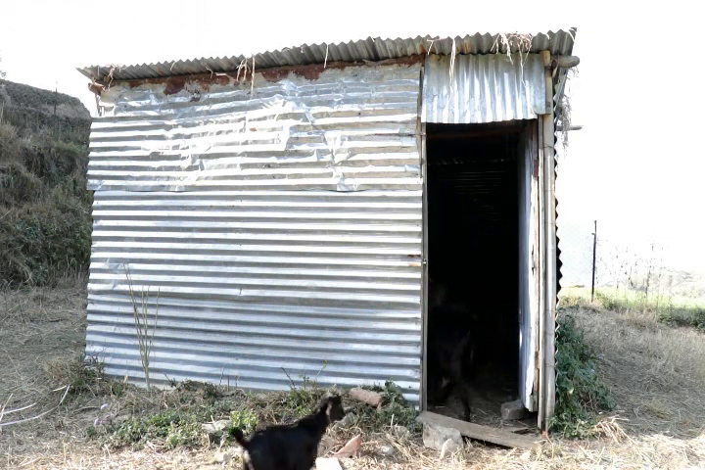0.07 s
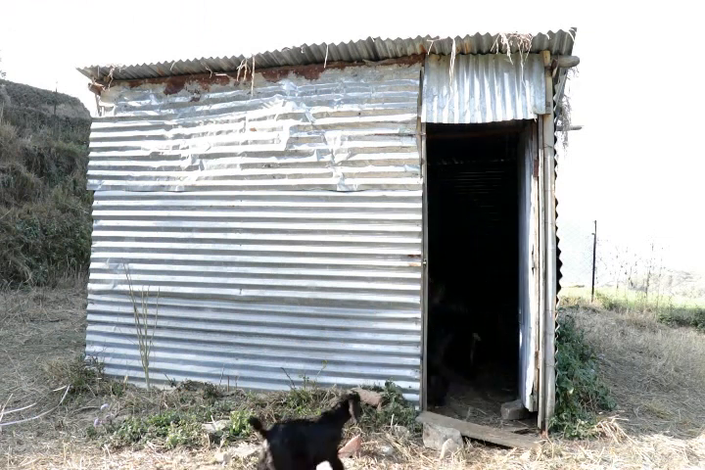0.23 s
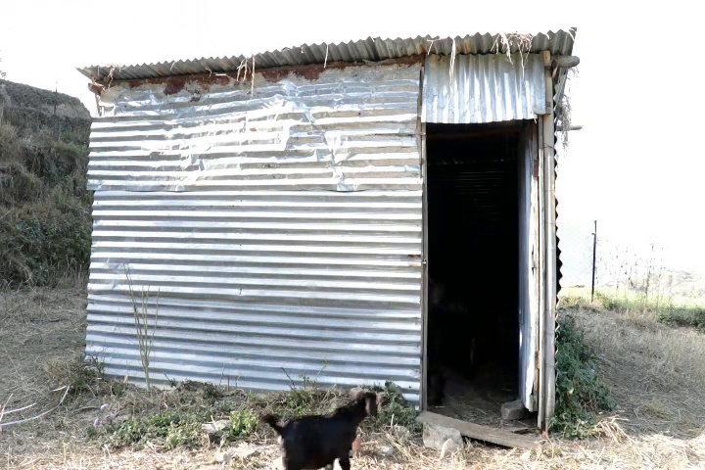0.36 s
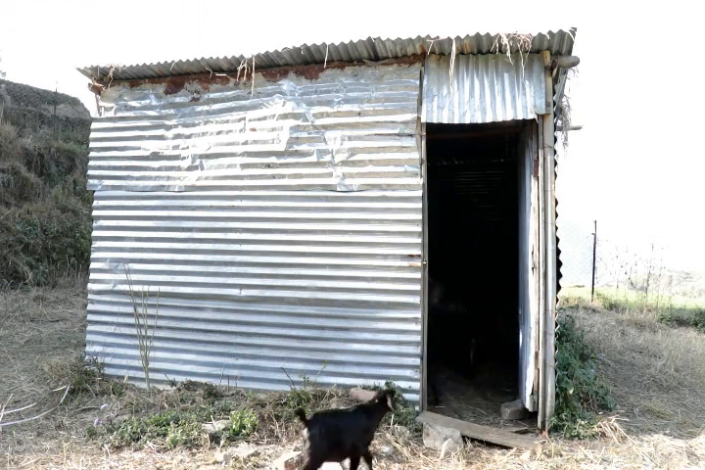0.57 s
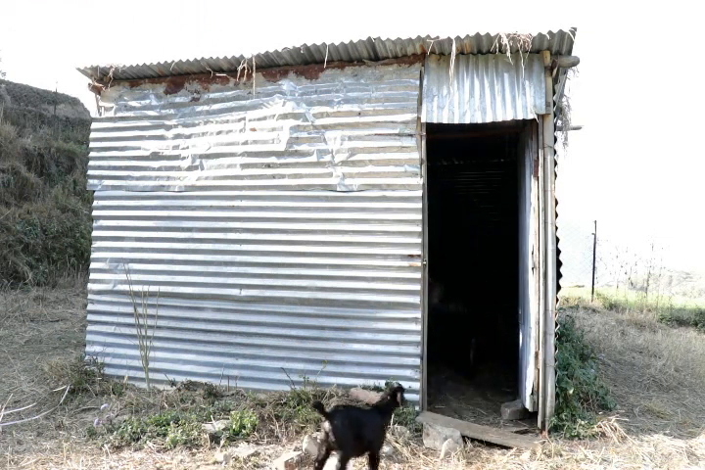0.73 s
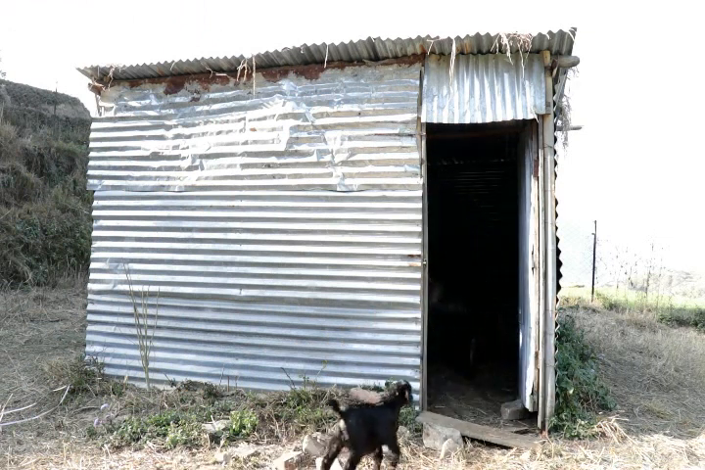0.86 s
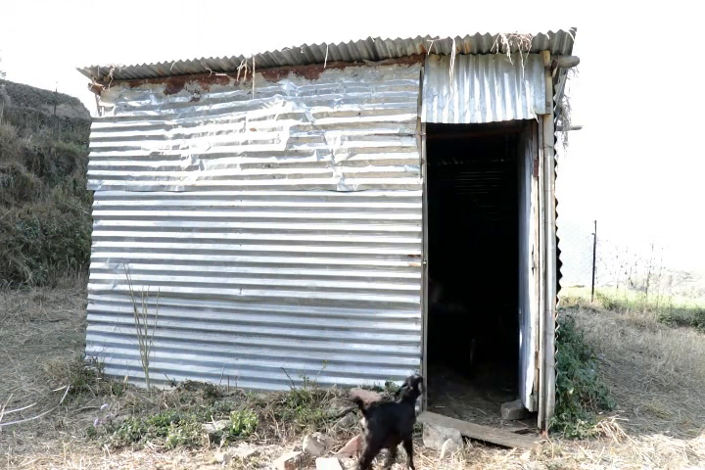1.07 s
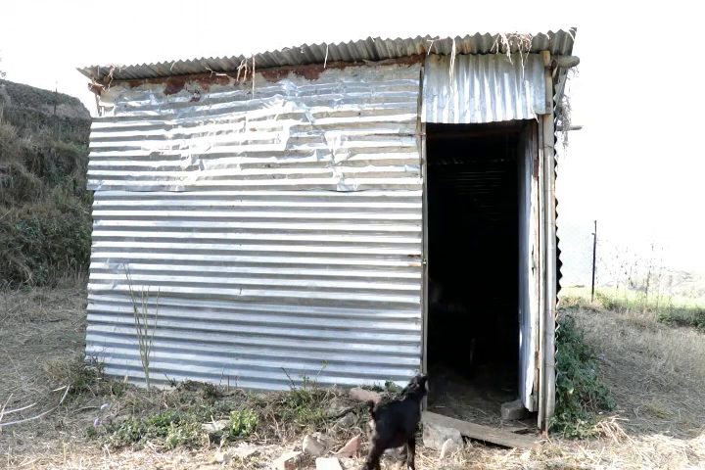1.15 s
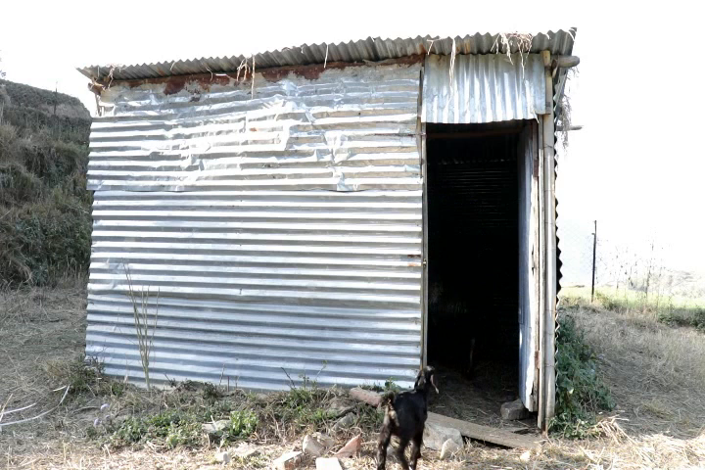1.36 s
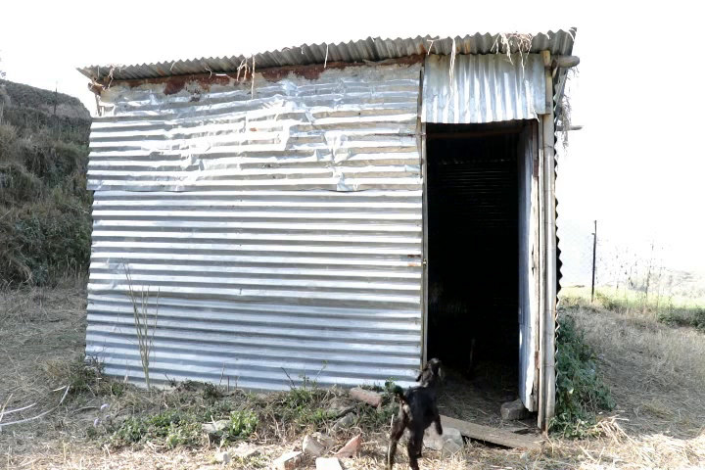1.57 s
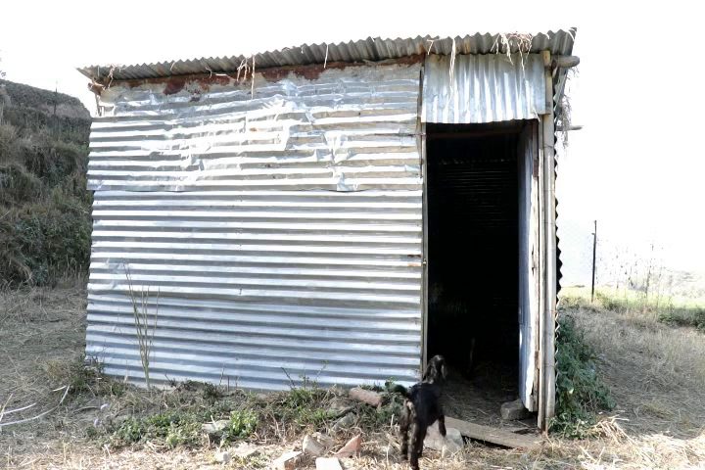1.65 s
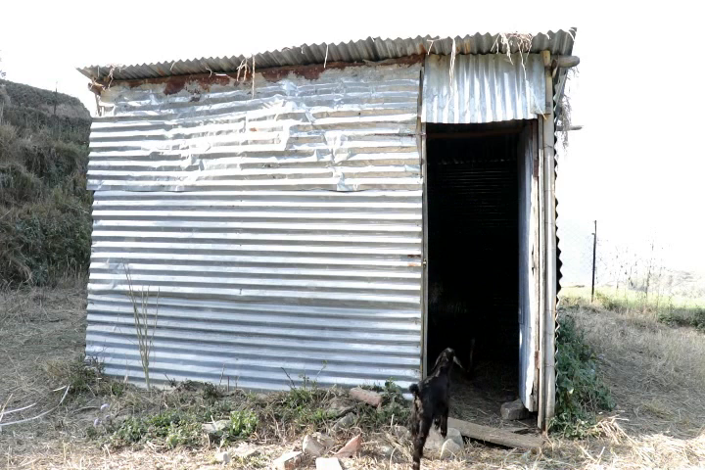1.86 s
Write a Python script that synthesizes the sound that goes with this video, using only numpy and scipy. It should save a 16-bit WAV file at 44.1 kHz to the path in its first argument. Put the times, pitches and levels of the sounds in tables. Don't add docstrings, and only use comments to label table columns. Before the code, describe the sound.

Single hard bang on a corrugated metal shed, hollow ring dying away over quiet goat steps outdoors

```python
import sys
import numpy as np
from scipy import signal
from scipy.fft import rfft, irfft, next_fast_len
from scipy.io import wavfile
from scipy.ndimage import map_coordinates

SR = 44100
rng = np.random.default_rng(int(sys.argv[2]) if len(sys.argv) > 2 else 0)


def gain_from_decibels(decibels):
    exponent = np.asarray(decibels, float) / 20
    return 10 ** exponent


def pcm_store(signal):
    levels = np.round(np.clip(np.atleast_2d(signal), -1, 1) * 32767)
    wavfile.write(sys.argv[1], SR, levels.astype(np.int16).T)


N = 83790

MODE_TOP_HZ = 5350


def door():
    # t/s, peak level/dB
    knock = [
        (0.225, -9.5),
    ]
    (knock_s, knock_db), = knock
    t = np.arange(N) / SR
    out = np.zeros(N)
    add(out, knock_s + 0.000752, gain_from_decibels(knock_db) * (panels(t) + hollow(t) + sheet(t)))
    walls = signal.butter(8, MODE_TOP_HZ, fs=SR, output="sos")
    add(out, knock_s + 0.0006, gain_from_decibels(knock_db) * signal.sosfilt(walls, blow(t)))
    return out + nudges() + signal.sosfilt(walls, rattles())


def blow(t):
    bend_turns = .2 * (1 - np.exp(-t / .0006))
    thud = np.zeros(len(t))
    for db, hz, t60_s in [(-1.5, 735, .045), (-5, 1100, .006), (-1, 2100, .0022)]:
        thud -= gain_from_decibels(db - 60 * t / t60_s) * np.sin(2 * np.pi * (hz * t + bend_turns))
    flex = gain_from_decibels(-13.5 - 60 * t / 0.068) * np.sin(2 * np.pi * 140 * t)
    return thud + flex


def panels(t):
    # f/Hz, level/dB, t60/s, twin offset/Hz
    door_modes = [(190.9, -31.5, 2.14, 2.4), (220.7, -23.5, 1.4, 6.3), (290.6, -17, 1.1, 5.7),
                  (375, -21, 1.12, 6.85), (419, -36, 0.88, 10), (494, -34.5, 2.1, 3.5),
                  (570, -29.5, 1.66, 4.2), (660, -22, 0.96, 5.3), (694, -15, 0.8, 2.9),
                  (720.5, -16.5, 0.82, 4.1), (767, -25.5, 1.12, 5.3), (912, -18.5, 0.53, 3.4),
                  (1136, -17, 0.32, 11.3),
                  (812, -30, .5, 3), (1023, -36, 0.37, 12), (1394, -38, 0.3, 5), (1640, -20.5, 0.45, 7.8),
                   (1923, -24.5, 0.51, 9.1), (2001, -11, 0.28, 2.4), (2191, -16, 0.37, 4.7),
                   (2764, -26, 0.27, 10), (2790, -21, 0.22, 14), (2982, -28, 0.42, 13.6),
                   (3390, -37, 0.18, 9), (3795, -24, .25, 3.1), (4320, -27, 0.18, 11),
                   (4820, -20, 0.15, 12)]
    twin_share, rise_s = 0.42, .005
    ring = np.zeros(len(t))
    for hz, db, t60_s, twin_hz in door_modes:
        start_turns = rng.random()
        mode = np.sin(2 * np.pi * (hz * t + start_turns))
        twin = np.sin(2 * np.pi * ((hz + twin_hz) * t + start_turns))
        ring += gain_from_decibels(db - 60 * t / t60_s) * (mode - twin_share * twin)
    return ring * (1 - np.exp(-t / rise_s))


def hollow(t):
    hz, twin_hz, twin_share, db, t60_s = 244.2, 3.96, 0.59, -20.5, 1.14
    beat = np.sin(2 * np.pi * hz * t) - twin_share * np.sin(2 * np.pi * (hz + twin_hz) * t)
    return gain_from_decibels(db - 60 * t / t60_s) * beat


def sheet(t):
    # f/Hz, level/dB per Hz
    sheet_tone = [(150, -10), (300, -6), (725, -6), (1400, -8), (2780, -9.5), (5200, -13.5), (5450, -15.5),
                  (10000, -20), (15500, -36)]
    # f/Hz, t60/s
    sheet_decay = [(70, 1.7), (150, 1.66), (300, 1.38), (700, 0.73), (1800, 0.47), (4800, 0.26),
                   (12800, 0.14)]
    count, low_hz, hold_s, rise_s = 360, 150, 0.039, .007
    scatter_db, t60_scatter = 2.5, 0.05
    hiss_db, step_db = -2.5, -3
    level_db, lumps_db, low_cut_hz = -9.5, .3, 78

    def aged(s):
        return np.hypot(s, hold_s) - hold_s

    place = (np.arange(count) + rng.random(count)) / count
    hz = low_hz + (MODE_TOP_HZ - low_hz) * place ** 1.3
    gain = gain_from_decibels(along(sheet_tone, hz) + scatter_db * rng.standard_normal(count)) * np.sqrt(np.gradient(hz))
    t60_s = along(sheet_decay, hz) * np.exp(t60_scatter * rng.standard_normal(count))
    short = t[:SR]
    fade = np.exp(np.outer(-np.log(1000) / t60_s, aged(short)))
    waves = np.sin(2 * np.pi * (np.outer(hz, short) + rng.random((count, 1))))
    modes = gain @ (fade * waves) * np.minimum(1, 5 * (1 - short))

    bins_hz, frames_s, z = signal.stft(rng.standard_normal(N), SR, nperseg=768)
    fade_db = -60 * aged(frames_s) / along(sheet_decay, bins_hz)[:, None]
    hiss = signal.istft(z * gain_from_decibels(fade_db), SR, nperseg=768)[1][:N]

    def dense(f):
        share = np.where(f < MODE_TOP_HZ, gain_from_decibels(hiss_db), gain_from_decibels(step_db))
        return gain_from_decibels(along(sheet_tone, f)) * share * (f > low_cut_hz)

    cloud = filtered(hiss, dense) * np.sqrt(SR / 2)
    cloud[:SR] += np.sqrt(2) * modes
    power = np.mean(gain_from_decibels(2 * along(sheet_tone, bins_hz))) * SR / 2
    level = gain_from_decibels(level_db + lumps_db * wobble(29.6))
    return level * cloud / np.sqrt(power) * (1 - np.exp(-t / rise_s))


def rattles():
    # t/s, level/dB, f/Hz, t60/s
    slaps = [(.2325, -10, 740, 0.017), (.236, -19, 4260, 0.09), (.2365, -16.5, 2840, 0.069),
             (.2425, -15, 2000, 0.027), (.248, -24, 4650, 0.048), (.249, -41, 2450, 0.024),
             (.259, -14.5, 770, 0.04), (.2595, -15, 2720, 0.041), (.272, -34, 3420, 0.049),
             (.288, -24, 1910, .06), (.29, -26, 700, 0.28), (.308, -28, 2580, 0.064),
             (.405, -32, 564, 0.11), (.478, -28, 392, 0.064), (.545, -35.5, 700, 0.11),
             (.635, -40, 434, 0.15), (.655, -49.5, 774, 0.24), (.441, -34, 660, 0.18),
             (.46, -26, 704, 0.06), (.498, -30.5, 570, 0.18), (.603, -33.5, 590, 0.07),
             (.771, -46, 660, 0.14)]
    return bursts(slaps, 0.24, rise_s=0.0022)


def nudges():
    # t/s, length/s, level/dB, f/Hz
    sways = [
        (.725, .235, -39.5, 246.5),
        (1.005, .17, -47, 245),
    ]
    out = np.zeros(N)
    for s, length_s, db, hz in sways:
        u = np.arange(round(length_s * SR)) / SR
        swell = np.abs(np.sin(np.pi * (u / length_s) ** 0.57)) ** 0.66
        add(out, s, gain_from_decibels(db) * swell * np.sin(2 * np.pi * hz * u))
    return out


def weeds():
    # t/s, level/dB
    shuffling = [(0, -52), (.05, -53), (.09, -50), (.14, -55), (.17, -59.5), (.58, -60), (.66, -53.5),
                 (.71, -57), (.82, -55.5), (.87, -59), (1.06, -58), (1.172, -51), (1.27, -56), (1.328, -50),
                 (1.45, -61), (1.7, -64.5), (1.8, -60), (1.9, -58)]
    # f/Hz, level/dB per Hz
    weed_tone = [(350, -51), (600, -26), (1360, -4.5), (2070, -11), (2280, -10.5), (10600, -9),
                 (15500, -12)]
    # t/s, level/dB, f/Hz, t60/s
    snaps = [(.1446, -41, 5830, .02), (.4409, -37.5, 5530, 0.023), (.449, -47, 5960, 0.024),
             (.493, -53, 11000, 0.16), (.5237, -37.5, 6360, 0.023), (.6085, -50, 8000, .01),
             (.6374, -41, 8000, 0.019), (.7272, -42, 7900, 0.032), (.781, -42, 4700, 0.04),
             (.9009, -41, 7900, 0.055), (.917, -47.5, 9000, 0.095), (1.0096, -42, 9700, 0.089),
             (1.065, -57, 13000, 0.018), (1.0939, -44.5, 9500, 0.032), (1.8287, -44, 9100, 0.017),
             (.5626, -44, 10000, .008),
        (.5786, -39, 8000, .008),
    ]
    rustle_db, grain_db, grains_per_s = 3, 2.5, 2300
    struck = rng.random(N) < grains_per_s / SR
    grains = struck * gain_from_decibels(grain_db * rng.exponential(size=N)) * rng.standard_normal(N)
    mixed = .5 * unit(grains) + rng.standard_normal(N)
    hiss = unit(filtered(mixed, lambda f: gain_from_decibels(along(weed_tone, f))))
    s, level_db = np.transpose(shuffling)
    shuffle_db = np.interp(np.arange(N) / SR, s, level_db) + 0.45 * wobble(30.5)
    return gain_from_decibels(rustle_db + shuffle_db) * hiss + bursts(snaps, 2, rise_s=0.00089)


def hooves():
    # t/s, level/dB, f/Hz, t60/s
    taps = [(.001, -51.5, 1250, 0.4), (.732, -40, 1705, 0.065), (0.7834, -36, 3360, 0.028),
            (.905, -41.5, 2174, 0.075), (.924, -37, 770, 0.047), (1.012, -44.5, 1126, 0.069),
            (1.079, -50.5, 422, 0.15), (1.196, -41, 476, 0.089), (1.292, -39, 505, 0.051),
            (1.32, -49, 1396, 0.22), (1.515, -35.5, 620, 0.06), (1.535, -51, 1410, 0.28),
            (1.589, -50.5, 1360, 0.14), (1.74, -42.5, 1420, 0.086)]
    # t/s, level/dB, f/Hz, t60/s
    plank_notes = [(0.9017, -37.5, 1158, 0.067), (0.9228, -32.5, 1154, 0.036), (.936, -43, 1185, 0.066),
                   (1.014, -46.5, 2227, 0.13), (1.7385, -33, 470, 0.015), (1.746, -38, 395, 0.025),
                   (1.748, -51, 1463, .06), (1.76, -43, 1450, 0.062), (.6035, -35, 710, 0.036)]
    # t/s, level/dB, f/Hz, t60/s
    thumps = [(0.073, -27, 125, 0.053), (0.105, -35, 140, 0.076), (.66, -40, 80, 0.43),
              (0.849, -35.5, 89.5, 0.071), (1.083, -33, 139, 0.05), (1.329, -44, 94, 0.097),
              (1.407, -46, 161, 0.037), (1.5, -34.5, 78.5, 0.061), (1.601, -48, 79.5, 0.12),
              (1.728, -53, 250, 0.1), (1.773, -39, 98, 0.091), (1.817, -43, 140, 0.05)]
    splash = [(s, db + 0.5, 700, 1.08 * t60_s) for s, db, hz, t60_s in taps]
    out = bursts(taps, .075, rise_s=0.0047) + bursts(splash, 1.4, rise_s=0.0053) + tin()
    t = np.arange(SR // 4) / SR
    for rows, rise_s in [(plank_notes, 0.00083), (thumps, 0.0021)]:
        for s, db, hz, t60_s in rows:
            decay = gain_from_decibels(db - 60 * t / t60_s) * (1 - np.exp(-t / rise_s))
            add(out, s, decay * np.sin(2 * np.pi * hz * t))
    return out


def tin():
    # t/s, level/dB, f/Hz, t60/s
    scrapes = [(.001, -56.5, 2330, 1), (1.192, -57, 2000, 0.26), (1.235, -58, 3160, 1),
               (1.03, -52, 450, .3), (1.092, -46.5, 750, 0.085), (1.165, -50.5, 480, 0.22),
               (1.514, -48.5, 1340, 0.18), (1.519, -49, 2320, 0.28), (1.587, -47, 800, 0.091),
               (1.742, -48, 3440, 0.28)]
    # t/s, level/dB, f/Hz, t60/s
    ribs = [(1.7418, -44, 3540, .07), (1.7485, -38.5, 3270, 0.06), (1.7595, -40.5, 2770, 0.056),
            (1.7655, -50, 3450, .05), (1.7715, -48, 3850, 0.089), (1.78, -48, 2900, 0.074),
            (1.794, -52, 3350, 0.21)]
    return bursts(scrapes, .48, rise_s=0.0015) + bursts(ribs, .3, rise_s=0.00078)


def squeak():
    start_s, length_s, top_hz, fall, rough_rad = 1.472, .042, 3120, .17, 1.6
    out, u = np.zeros(N), np.linspace(0, 1, round(length_s * SR))
    for ratio, db in [(1, -50), (.87, -52)]:
        phase = 2 * np.pi * np.cumsum(ratio * top_hz * (1 - fall * u)) / SR
        grip_db = 4 * wobble(300)[:len(u)]
        tone = np.sin(phase + rough_rad * wobble(600)[:len(u)])
        add(out, start_s, gain_from_decibels(db + grip_db) * np.sin(np.pi * u) ** .5 * tone)
    return out


def air():
    # f/Hz, level/dB per Hz
    air_tone = [(12, -41), (20, -1), (133, -5.5), (430, -11), (618, -13.5), (965, -17.5), (1390, -19),
                (15700, -40.5)]
    # t/s, bass swell level/dB
    wind = [(0, 2), (.2, 4), (.5, 5), (.8, 0.5), (1.05, -1.5), (1.2, 2), (1.5, 2), (1.7, -3), (1.9, 2.5)]
    noise = unit(filtered(rng.standard_normal(N), lambda f: gain_from_decibels(along(air_tone, f))))
    low = filtered(noise, lambda f: 1 / (1 + (f / 300) ** 2))
    swell_db = np.interp(np.arange(N) / SR, *np.transpose(wind))
    return gain_from_decibels(-48.5) * (noise - low + low * gain_from_decibels(swell_db + 2.5 * wobble(6.75)))


def bursts(rows, width, rise_s):
    out, t = np.zeros(N), np.arange(SR // 4) / SR
    for s, db, hz, t60_s in rows:
        def resonance(f):
            damping = 1j * f * hz * width
            return (damping / (hz * hz - f * f + damping)) ** 2

        noise = unit(filtered(rng.standard_normal(len(t)), resonance))
        add(out, s, gain_from_decibels(db - 60 * t / t60_s) * (1 - np.exp(-t / rise_s)) * noise)
    return out


def unit(x):
    return x / np.sqrt(np.mean(x ** 2) + 1e-20)


def along(points, hz):
    f, v = np.transpose(points)
    return np.interp(np.log(hz + 1), np.log(f + 1), v)


def wobble(rate_hz):
    knots = rng.standard_normal(int(N * rate_hz / SR) + 4)
    return map_coordinates(knots, [np.arange(N) * rate_hz / SR])


def filtered(x, response):
    m = next_fast_len(len(x) + 8192)
    return irfft(rfft(x, m) * response(np.fft.rfftfreq(m, 1 / SR)), m)[:len(x)]


def add(out, s, x):
    part = out[max(round(s * SR), 0):][:len(x)]
    part += x[:len(part)]


def scene():
    return (door() + weeds() + hooves() + squeak() + air())[None]


def low_pass(x):
    return signal.sosfilt(signal.butter(12, 15870, fs=SR, output="sos"), x)


def record(dry):
    low_hz, top_hz = 45, 15850
    heard = filtered(dry[0], lambda f: (f < top_hz) * 1j * f / (low_hz + 1j * f))
    return low_pass(heard[None])


dry = scene()
out = record(dry)
pcm_store(out)
```